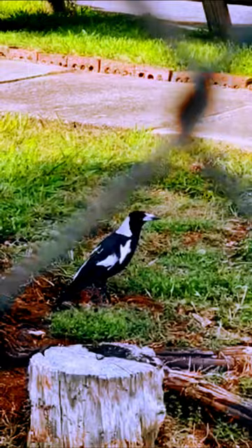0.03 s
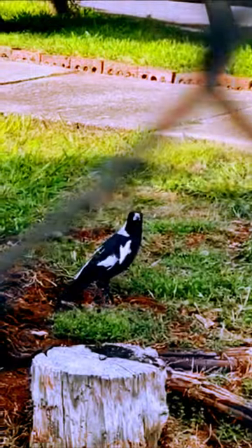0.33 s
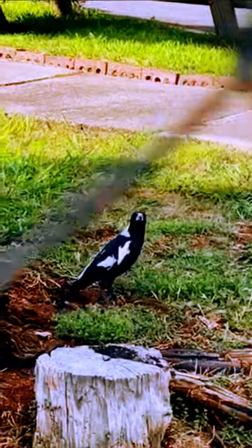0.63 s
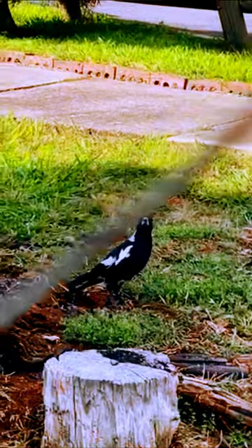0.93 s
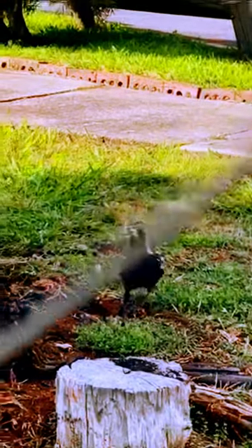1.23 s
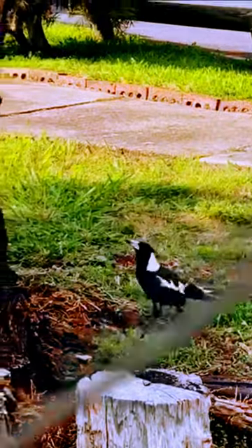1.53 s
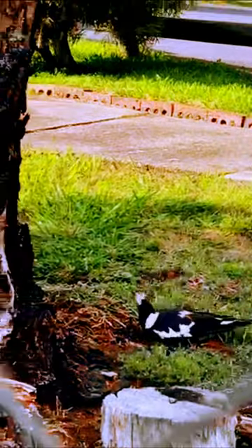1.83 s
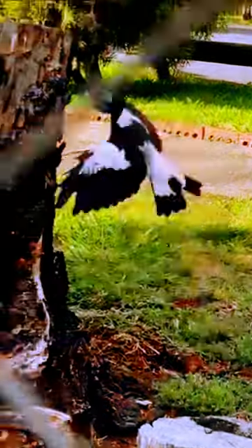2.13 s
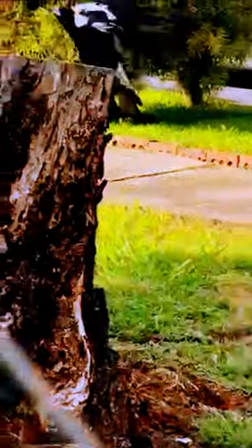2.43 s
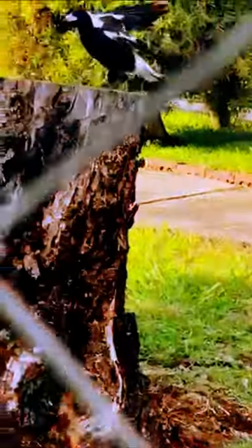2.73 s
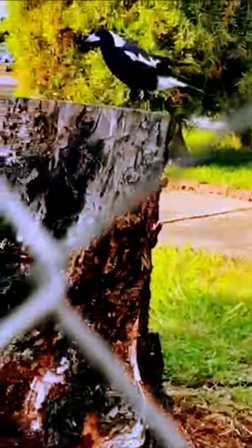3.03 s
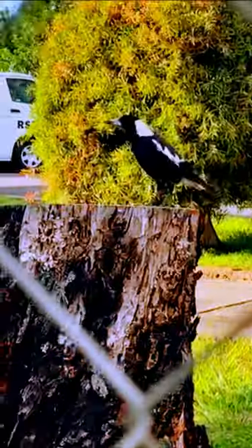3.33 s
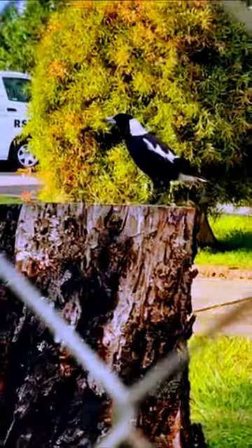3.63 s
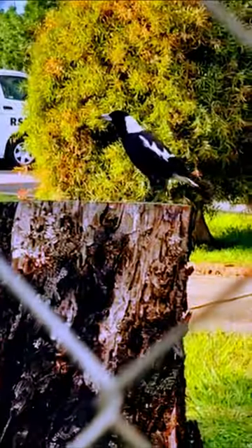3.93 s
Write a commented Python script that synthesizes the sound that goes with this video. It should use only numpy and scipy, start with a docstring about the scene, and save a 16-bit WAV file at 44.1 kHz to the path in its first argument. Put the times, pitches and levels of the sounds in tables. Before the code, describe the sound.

A magpie warbles trills and fluted notes, slightly to the left, from about 0.3 to 0.9 seconds. Its wings rustle faintly around 2 to 2.4 seconds. From 3.4 seconds to the end at 4 it stutters and warbles again. Wind rumbles on the microphone throughout over a light hiss, with soft handling bumps and ticks, strongest near 2.3 seconds. A distant bird whistles very faintly around 1 second.

```python
"""Magpie on a windy lawn

A magpie's syrinx warbles two phrases of fluted notes and trills, with dry rasps and a stutter.
Between them its feet and wings rustle as it flies up to a stump. Wind rumbles and buffets the
hand-held microphone, with soft bumps and ticks, over a faint far bird and a steady outdoor hiss."""
import sys
import numpy as np
from scipy import signal
from scipy.fft import rfft, irfft
from scipy.io import wavfile

SR = 44100
rng = np.random.default_rng(int(sys.argv[2]) if len(sys.argv) > 2 else 0)


def persist_wave(psi):
    """Save psi, clipped to +-1, as 16-bit WAV."""
    counts = np.round(np.clip(psi, -1, 1) * 32767).astype(np.int16)
    wavfile.write(sys.argv[1], SR, np.atleast_2d(counts).T)


N = 176400
TIME = np.arange(N) / SR


def amp(db):
    """Decibels to gain."""
    return 10 ** (np.asarray(db) / 20)


def unit(x):
    """Scale to rms 1."""
    return x / np.sqrt(np.mean(abs(x) ** 2) + 1e-20)


def at_hz(points, hz):
    """Interpolate a table on a log-frequency axis."""
    points_hz, values = np.transpose(points)
    return np.interp(np.log(hz + 1), np.log(points_hz + 1), values)


def add(mix, start_s, sound):
    """Mix a sound in at start_s."""
    part = mix[..., max(round(start_s * SR), 0):][..., :sound.shape[-1]]
    part += sound[..., :part.shape[-1]]


def wander(size, cutoff_hz):
    """Low-passed noise, rms about 1."""
    hz = np.fft.rfftfreq(SR, 1 / SR)
    return unit(irfft(rfft(rng.standard_normal(SR)) / (1 + (hz / cutoff_hz) ** 4)))[:size]


def gate(t, length_s, attack_s, release_s):
    """Sine-squared attack and release around a hold."""
    rise = np.sin(np.pi / 2 * np.clip(t / attack_s, 0, 1))
    fall = np.sin(np.pi / 2 * np.clip((length_s - t) / release_s, 0, 1))
    return (rise * fall) ** 2


def hump(start_s, length_s):
    """Half-sine swell on the scene's time axis."""
    return np.sin(np.pi * np.clip((TIME - start_s) / length_s, 0, 1))


# Upper harmonics: harmonic, full_voice_db, growth_db_per_db
OVERTONES = [(3, -34, .8), (4, -33.5, 3.5)]

def syrinx(hz, level, roughness, second_db=-42, split_db=-60):
    """Near-pure tone, brighter when loud. Roughness shakes pitch and level; a split adds 1.5 x pitch."""
    size = len(hz)
    phase = 2 * np.pi * np.cumsum(hz * (1 + .19 * roughness * wander(size, 270))) / SR
    effort = np.minimum(level / amp(-28), 1)  # 1 at full voice
    tone = np.exp(1j * phase) + amp(second_db) * np.exp(2j * phase)
    tone += sum(amp(db) * effort ** growth * np.exp(1j * k * phase) for k, db, growth in OVERTONES)
    tone += amp(split_db) * wander(size, 190) * np.exp(1.5j * phase)
    return np.sqrt(2) * tone * level * (1 + roughness * wander(size, 170))


# Glides: start_s, length_s, from_hz, to_hz, from_db, to_db, release_s, roughness
FLUTED_NOTES = [(0.456, 0.052, 1076, 1069, -26.5, -27, .038, 0.04),
                (0.526, 0.02, 1150, 1134, -40.5, -41, 0.0044, 0),
                (0.539, 0.016, 1506, 1570, -46.5, -47, 0.0054, 0.04),
                (0.788, 0.021, 1448, 1434, -46.5, -32.5, 0.0069, 0.03),
                (0.809, .012, 1233, 1460, -36, -26.5, 0.0067, 0.09),
                (0.814, 0.012, 1620, 1610, -42, -42.5, 0.0024, 0),
                (0.821, 0.036, 1176, 1131, -23, -46.5, 0.013, 0),
                (3.485, 0.0082, 1380, 1160, -31.5, -45, .002, 0.24),
                (3.491, 0.013, 1007, 1126, -31, -35, 0.0018, 0.11),
                (3.498, 0.021, 1070, 1066, -46, -56, 0.0046, 0.2),
                (3.637, 0.039, 977, 1010, -47, -34, 0.022, 0.11),
                (3.666, 0.023, 1365, 1270, -46.5, -58, 0.005, 0.5),
                (3.684, 0.025, 1163, 1130, -38.5, -34.5, 0.0038, 0.03),
                (3.704, 0.017, 1403, 1490, -35.5, -45, 0.0093, 0),
                (3.887, 0.051, 1475, 1043, -49, -56.5, 0.0047, 0.48),
                (3.929, 0.094, 1194, 1217, -50.5, -40, .01, 0.05),
                (3.93, 0.08, 976, 1012, -51, -49, .01, 0.07)]
ATTACK_S = .0061

def fluted_notes(song):
    """Short notes, each gliding in pitch and level."""
    for start_s, length_s, from_hz, to_hz, from_db, to_db, release_s, roughness in FLUTED_NOTES:
        t = np.arange(0, length_s, 1 / SR)
        progress = t / length_s
        level = amp(from_db + (to_db - from_db) * progress) * gate(t, length_s, ATTACK_S, release_s)
        add(song, start_s, syrinx(from_hz + (to_hz - from_hz) * progress, level, roughness))


# One contour per whistle: time_s, pitch_hz, level_db
WHISTLE_CONTOURS = [
    [(.548, 1118, -33.5), (.58, 1102, -30.5), (.615, 1112, -34.5), (.662, 1134, -35), (.69, 1116, -49)],
    [(3.712, 1154, -35), (3.775, 1129, -32.5), (3.818, 1139, -34), (3.832, 1184, -40.5),
     (3.842, 1270, -56.5)],
]

def whistles(song):
    """Two held notes that bend in pitch."""
    for contour in WHISTLE_CONTOURS:
        time_s, pitch_hz, level_db = np.transpose(contour)
        start_s, end_s = time_s[0], time_s[-1]
        t = np.arange(start_s, end_s, 1 / SR)
        level = amp(np.interp(t, time_s, level_db))
        level *= gate(t - start_s, end_s - start_s, ATTACK_S, ATTACK_S)
        add(song, start_s, syrinx(np.interp(t, time_s, pitch_hz), level, roughness=.014))


# Trills: start_s, length_s, attack_s, from_hz, to_hz, swing_hz, from_rate_hz, to_rate_hz,
# from_db, to_db, roughness, second_db, split_db
TRILL_RUNS = [(.256, .203, .034, 920, 950, 205, 56.6, 39.3, -45, -29, .09, -20, -40),
              (.739, .056, .006, 1290, 1350, 170, 78, 76, -51, -45.5, .35, -30, -22),
              (.883, .059, .021, 935, 895, 115, 64, 66, -31.5, -36, .17, -24, -16),
              (3.836, .054, .006, 1230, 1270, 130, 58, 52, -57, -55, .5, -30, -20)]

def trills(song, jitter_beats=.035, throb_db=3.2, lead_beats=.13):
    """Pitch flicks up in narrow, uneven peaks; the level throbs just ahead of each."""
    for (start_s, length_s, attack_s, from_hz, to_hz, swing_hz, from_rate_hz, to_rate_hz,
         from_db, to_db, roughness, second_db, split_db) in TRILL_RUNS:
        t = np.arange(0, length_s, 1 / SR)
        progress = t / length_s
        rate_hz = from_rate_hz + (to_rate_hz - from_rate_hz) * progress
        beats = np.cumsum(rate_hz) / SR + jitter_beats * wander(len(t), 56)
        peaks = abs(np.cos(np.pi * beats)) ** 6
        throb = np.cos(np.pi * (beats + lead_beats)) ** 2 - .5
        ramp_db = from_db + (to_db - from_db) * progress
        level = amp(ramp_db + throb_db * throb) * gate(t, length_s, attack_s, release_s=.007)
        depth = np.minimum(progress / .36, 1) * (1 + .12 * wander(len(t), 36))
        pitch_hz = from_hz + (to_hz - from_hz) * progress + swing_hz * peaks * depth
        brightness_db = .25 * (ramp_db - to_db) - 20 * peaks
        add(song, start_s, syrinx(pitch_hz, level, roughness, second_db + brightness_db, split_db))


# Chirps: start_s, length_s, pitch_hz, level_db
STUTTER_CHIRPS = [(3.362, 0.0072, 865, -43.5), (3.372, 0.011, 836, -43), (3.385, .012, 840, -40),
                  (3.398, .013, 828, -39), (3.413, 0.0091, 802, -42), (3.424, 0.012, 840, -44)]

def stutter(song):
    """A quick run of tiny rising chirps."""
    for start_s, length_s, pitch_hz, level_db in STUTTER_CHIRPS:
        t = np.arange(0, length_s, 1 / SR)
        rise = 1 + .2 * (t / length_s - .5)
        level = amp(level_db) * gate(t, length_s, .00084, .00082)
        add(song, start_s, syrinx(pitch_hz * rise, level, roughness=.17))


# Rasps: start_s, length_s, centre_hz, half_width_hz, level_db
RASP_BANDS = [(.37, 0.095, 4050, 450, -67), (0.694, .16, 3550, 450, -63), (0.889, 0.051, 3900, 1000, -60)]

def rasps(song, grain_db=4):
    """Dry, grainy noise bands above the voice."""
    for start_s, length_s, centre_hz, half_width_hz, level_db in RASP_BANDS:
        t = np.arange(0, length_s, 1 / SR)
        band = wander(len(t), half_width_hz) + 1j * wander(len(t), half_width_hz)
        grain = unit(amp(grain_db * wander(len(t), 150)))
        level = amp(level_db) * np.sin(np.pi * t / length_s)
        add(song, start_s, level * band * grain * np.exp(2j * np.pi * centre_hz * t))


# Magpie's position: time_s, left_minus_right_db
MAGPIE_PAN = [(.5, 3), (.9, 3.5), (3.4, 4), (3.7, 9.5)]

def magpie(gain_db=-2.5, right_lead_rad=.57):
    """The whole song, left of centre."""
    song = np.zeros(N, complex)
    for add_part in (fluted_notes, whistles, trills, stutter, rasps):
        add_part(song)
    pan = amp(np.interp(TIME, *np.transpose(MAGPIE_PAN)) / 2)
    return amp(gain_db) * np.array([song * pan, song / pan * np.exp(1j * right_lead_rad)]).real


# Feet and wings: start_s, length_s, centre_hz, width_hz, level_db
RUSTLE_PUFFS = [(1.185, .023, 10000, 4000, -64.5), (1.952, .04, 12500, 2000, -65),
                (2.135, .017, 10000, 5000, -58), (2.141, .011, 1700, 1300, -50),
                (2.04, .25, 12200, 2200, -73), (2.214, .17, 4200, 600, -62), (2.335, .09, 3700, 504, -57),
                (3.359, .012, 9000, 5000, -67)]

def rustles():
    """Short bright puffs of noise as the bird hops, flaps and lands."""
    hz, out = np.fft.rfftfreq(N, 1 / SR), np.zeros((2, N))
    white = rfft(rng.standard_normal((2, N)))
    for start_s, length_s, centre_hz, width_hz, level_db in RUSTLE_PUFFS:
        band = unit(irfft(white * np.exp(-.5 * ((hz - centre_hz) / width_hz) ** 2), N))
        out += amp(level_db) * hump(start_s, length_s) ** 2 * band
    return out


# Channel likeness: frequency_hz, coherence
NOISE_COHERENCE = [(30, 0.3), (100, 1), (280, 0.3), (420, 0), (800, 0.26), (1300, 0), (1700, 0.13),
                   (1950, 1), (5000, 0.99), (5900, 1), (7000, 0.75), (8000, 1), (13000, 1)]
# Channel balance: frequency_hz, left_minus_right_db
NOISE_BALANCE = [(50, 2), (350, 1), (700, 3), (1100, 6.5), (1600, 3.5), (2300, -0.5)]
# Recorder's stereo widening: frequency_hz, left_lead_rad
WIDENING_PHASE = [(20, 1), (100, 1.2), (300, 2.2), (1150, 2.8), (1850, 6.6), (2550, 8.6), (3800, 7.1),
                  (5100, 7.6), (5700, 9.4), (6250, 9.4), (7650, 12.6), (8800, 12.6), (9750, 15.7),
                  (10900, 15.7), (11800, 18.8), (13200, 18.8), (14000, 22)]

def stereo_noise(spectrum, coherence=NOISE_COHERENCE):
    """Coloured noise of rms 1, spread wide by the recorder's stereo widening."""
    hz = np.fft.rfftfreq(N, 1 / SR)
    left, independent = rfft(rng.standard_normal((2, N)))
    shared = np.clip(at_hz(coherence, hz), 0, 1)
    right = shared * left + np.sqrt(1 - shared ** 2) * independent
    right *= np.exp(-1j * at_hz(WIDENING_PHASE, hz))
    pan = amp(at_hz(NOISE_BALANCE, hz) / 2)
    return unit(irfft(np.array([left * pan, right / pan]) * amp(at_hz(spectrum, hz)), N))


# Wind strength: time_s, level_db
WIND_STRENGTH = [(0, -39.5), (.1, -42.5), (.42, -49), (.7, -48), (1, -48.5), (1.12, -43), (1.4, -44),
                 (1.7, -49), (1.9, -42.5), (2.05, -50), (2.38, -40.5), (2.47, -58.5), (2.7, -43),
                 (2.78, -52), (2.88, -43.5), (3.18, -49), (3.4, -42), (4, -42.5)]
# Buffets: start_s, length_s, rumble_db, flutter_db
WIND_BUFFETS = [(0.039, 0.096, -36, -39), (0.139, 0.065, -36.5, -62), (0.241, 0.037, -29.5, -53),
                (0.313, 0.046, -38.5, -37.5), (0.51, 0.065, -38, -43), (0.618, 0.057, -37.5, -45),
                (1.764, 0.024, -67, -42), (1.877, 0.12, -37.5, -41.5), (2.081, 0.19, -36, -53.5),
                (2.286, 0.066, -33.5, -37), (2.33, 0.085, -35.5, -65), (2.555, 0.062, -40.5, -59),
                (2.797, 0.077, -35.5, -49), (2.9, 0.13, -38, -49), (3.031, 0.07, -38.5, -46.5),
                (3.502, 0.087, -37.5, -61), (3.747, 0.062, -35.5, -70)]
# Rumble colour: frequency_hz, density_db
RUMBLE_SPECTRUM = [(20, -23.5), (40, -8.5), (62, 1), (100, -5), (160, -14), (250, -21.5), (500, -33.5),
                   (1500, -67.5)]
# Flutter colour: frequency_hz, density_db
FLUTTER_SPECTRUM = [(50, -9), (130, 3.5), (220, 4), (400, -4.5), (700, -17.5), (1500, -35), (3000, -65.5)]
# Flutter's channel likeness: frequency_hz, coherence
FLUTTER_COHERENCE = [(60, 0.3), (250, 0.82)]

def wind():
    """Wind rumbles on the microphone; each buffet swells it and adds a higher flutter."""
    rumble_power = amp(np.interp(TIME, *np.transpose(WIND_STRENGTH))) ** 2
    flutter_power = np.zeros(N)
    for start_s, length_s, rumble_db, flutter_db in WIND_BUFFETS:
        swell = hump(start_s, length_s)
        rumble_power += (amp(rumble_db) * swell) ** 2
        flutter_power += (amp(flutter_db) * swell) ** 2
    rumble = np.sqrt(rumble_power) * stereo_noise(RUMBLE_SPECTRUM)
    flutter = np.sqrt(flutter_power) * stereo_noise(FLUTTER_SPECTRUM, FLUTTER_COHERENCE)
    return rumble + flutter


# Bumps: start_s, level_db, pitch_hz, knock_relative_db
HANDLING_BUMPS = [(0.073, -31, 190, -30), (.326, -33, 190, -14.5), (0.637, -28, 157, -21),
                  (1.771, -42, 210, -11), (1.841, -33.5, 102, -8.5), (1.936, -32.5, 174, -2.5),
                  (2.145, -24.5, 82, -22.5), (2.315, -22.5, 115, -11.5), (2.325, -32.5, 484, -4),
                  (2.838, -32, 101, -20)]

def bumps(knock_hz=390.6, rise_s=.0019, decay_s=.0064):
    """Handling bumps the microphone: a dull tone and a knock, both quickly damped."""
    out, t = np.zeros((2, N)), np.arange(SR // 10) / SR
    envelope = (1 - np.exp(-t / rise_s)) * np.exp(-t / decay_s)
    for start_s, level_db, pitch_hz, knock_relative_db in HANDLING_BUMPS:
        knock = amp(knock_relative_db) * np.exp(2j * np.pi * knock_hz * t)
        left = 2 * amp(level_db) * envelope * (np.exp(2j * np.pi * pitch_hz * t) + knock)
        right = left * np.exp(-1j * at_hz(WIDENING_PHASE, pitch_hz))
        add(out, start_s, np.array([left, right]).imag)
    return out


# Ticks: start_s, peak_db
HANDLING_TICKS = [(.5355, -42), (.5555, -43), (.59, -40), (.786, -39), (.894, -40), (1.2965, -36.5),
                  (1.5587, -42), (1.7462, -37.5), (1.7661, -40.5), (1.9805, -36), (2.1638, -36.5),
                  (2.4276, -37), (2.4983, -43), (2.6255, -38.5)]
# Tick colour: frequency_hz, density_db
TICK_SPECTRUM = [(80, -20), (300, 0), (1000, 0), (1400, -4), (1850, -5), (2250, -22), (3500, -34),
                 (6000, -55)]

def ticks(top_hz=2000, onset_s=.001, s_per_octave=.001, right_lag_s=.00033):
    """Dry handling clicks that fall in pitch: treble arrives first, bass last."""
    hz, out = np.fft.rfftfreq(2048, 1 / SR), np.zeros((2, N))
    delay_s = onset_s + s_per_octave * np.log2(top_hz / np.clip(hz, 100, top_hz))
    phase = -2 * np.pi * np.cumsum(delay_s) * hz[1]
    click = irfft(amp(at_hz(TICK_SPECTRUM, hz)) * np.exp(1j * phase))
    click /= abs(click).max()
    for start_s, peak_db in HANDLING_TICKS:
        add(out[0], start_s, amp(peak_db) * click)
        add(out[1], start_s + right_lag_s, amp(peak_db) * click)
    return out


# Far calls: start_s, length_s, pitch_hz, level_db
FAR_WHISTLES = [(.83, 0.13, 2890, -70.5), (.9, 0.11, 2840, -62.5), (0.923, 0.12, 2700, -69),
                (1.432, 0.075, 3890, -63.5), (3.717, 0.22, 2714, -75.5)]

def far_bird():
    """Thin distant whistles, each on one pitch."""
    out = np.zeros(N)
    for start_s, length_s, pitch_hz, level_db in FAR_WHISTLES:
        t = np.arange(0, length_s, 1 / SR)
        level = amp(level_db) * gate(t, length_s, .02, .069)
        add(out, start_s, syrinx(np.full(len(t), pitch_hz), level, roughness=.027).real)
    return out


def yard_echo(sound, gain_db=-13.5, t60_s=.1, predelay_s=.006):
    """Faint scatter from ground, fence and trees."""
    t = np.arange(SR // 2) / SR
    tail = rng.standard_normal((2, len(t))) * amp(-60 * t / t60_s) * (t > predelay_s)
    return amp(gain_db) * signal.fftconvolve(sound, tail / np.linalg.norm(tail[0]), axes=1)[:, :N]


# Hiss colour: frequency_hz, density_db
AIR_SPECTRUM = [(30, -3), (100, -5.5), (300, -0.5), (600, -0.5), (1100, -6.5), (1600, -10), (2300, -16),
                (3900, -18), (5500, -23), (8500, -26.5), (11000, -32.5), (12500, -35), (14000, -41),
                (15700, -51)]
# Low-mid band of the hiss: time_s, gain_db
AIR_LOW_MID = [(.2, -1.5), (1, -0.5), (1.55, -2), (2.1, -1), (2.9, -3), (3.3, -2), (3.55, -10.5)]

def air(level_db=-51, low_mid_hz=(330, 640)):
    """Steady outdoor hiss; its low mids thin out towards the end."""
    hiss = amp(level_db) * stereo_noise(AIR_SPECTRUM)
    low_mid = signal.sosfiltfilt(signal.butter(2, low_mid_hz, "band", fs=SR, output="sos"), hiss)
    gain = amp(np.interp(TIME, *np.transpose(AIR_LOW_MID)))
    return hiss + (gain - 1) * low_mid


def scene():
    """Both birds and their echo, with wind, handling, rustles and air."""
    birds = magpie() + far_bird()
    return birds + yard_echo(birds) + wind() + bumps() + ticks() + rustles() + air()


def record(dry):
    """30 ms of silence, a 12 ms fade-in and a steep low-pass."""
    fade_in = np.clip((TIME - .03) / .012, 0, 1)
    cutoff_hz = 15750
    lowpass = signal.firwin(511, cutoff_hz, window=("kaiser", 9), fs=SR)
    return signal.oaconvolve(dry * fade_in, lowpass[None], "same")


dry = scene()
out = record(dry)
persist_wave(out)
```